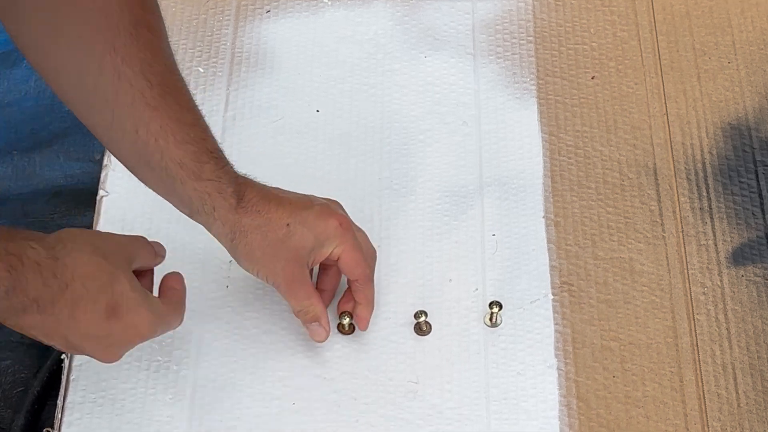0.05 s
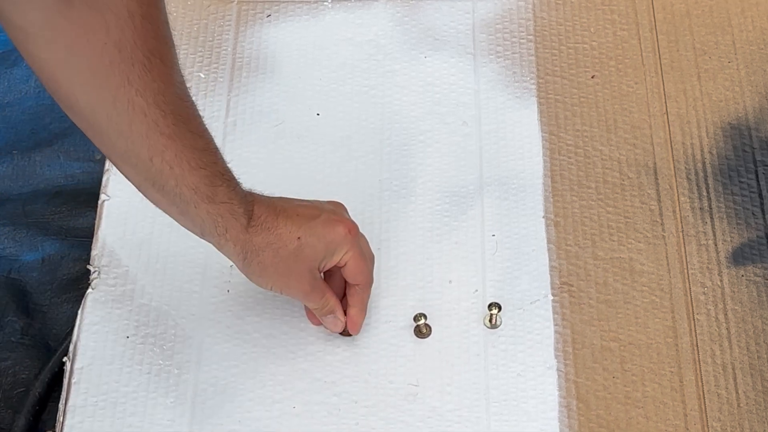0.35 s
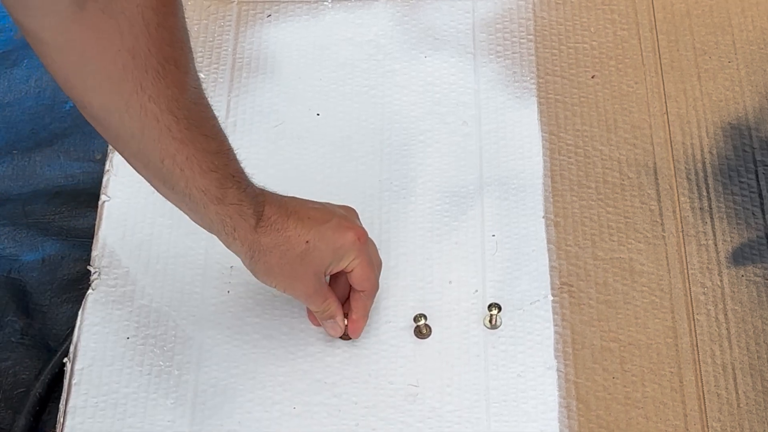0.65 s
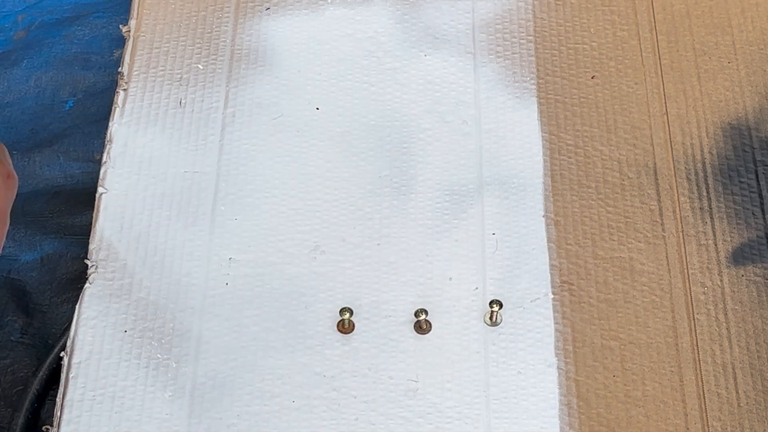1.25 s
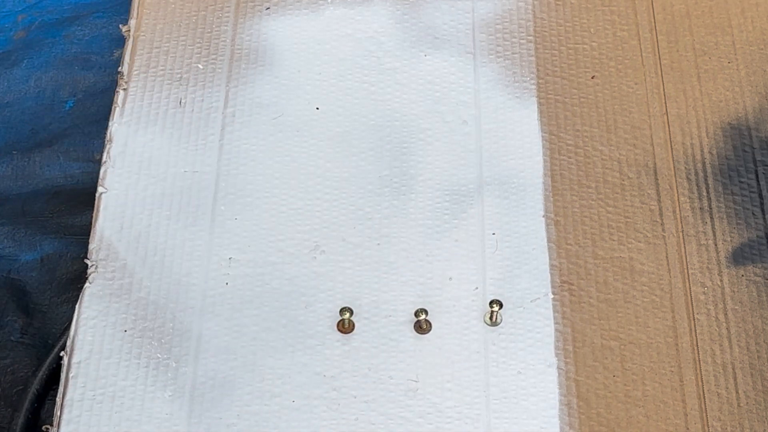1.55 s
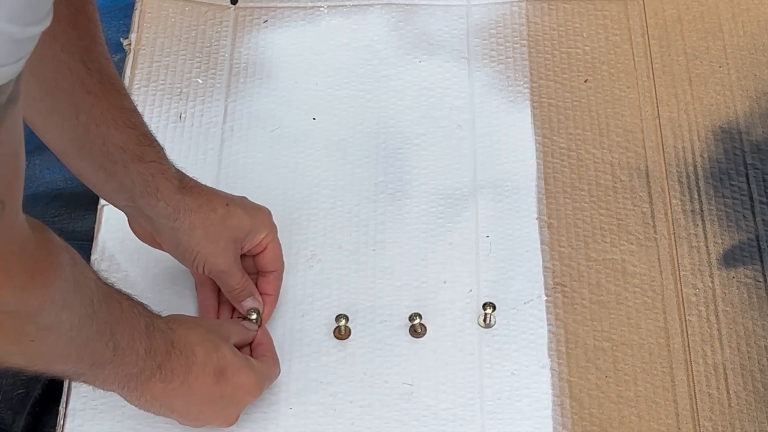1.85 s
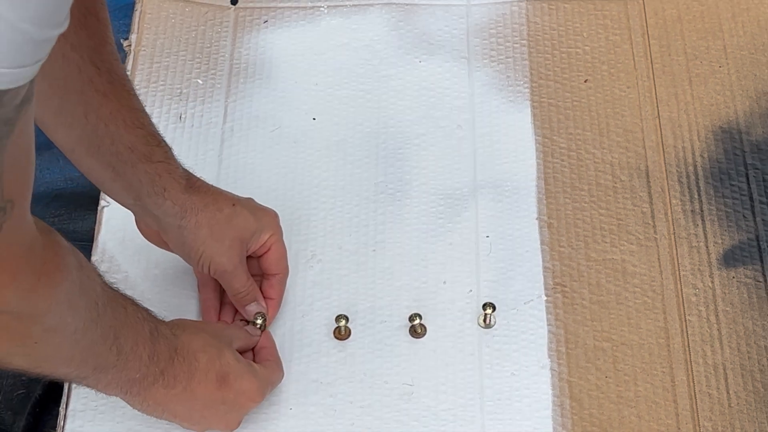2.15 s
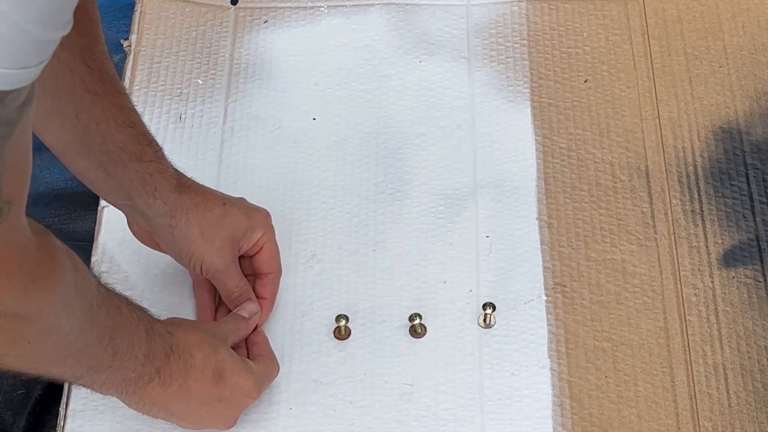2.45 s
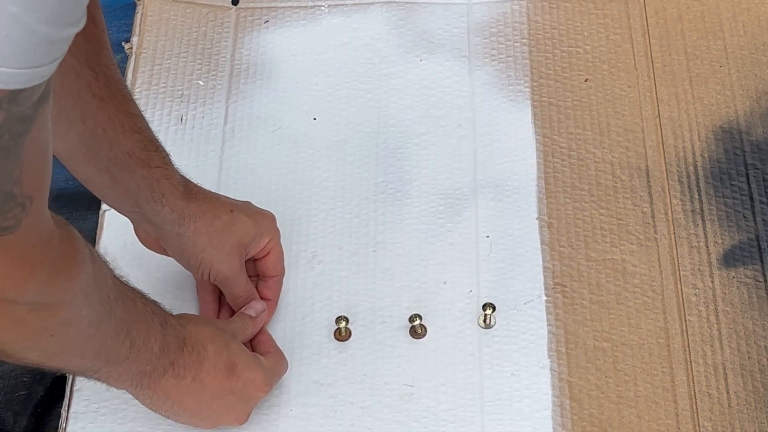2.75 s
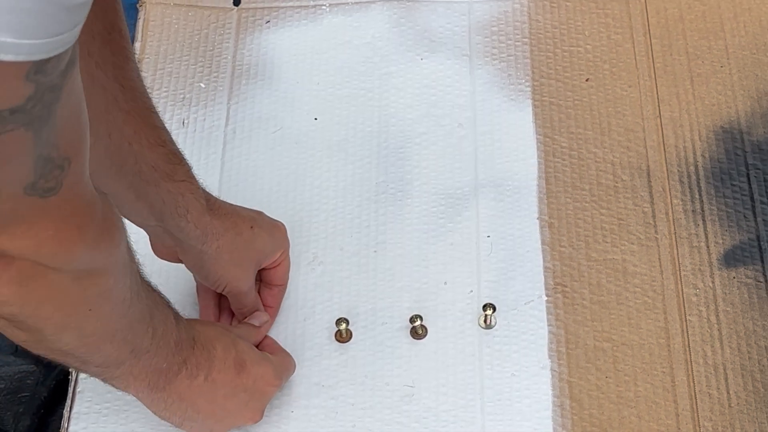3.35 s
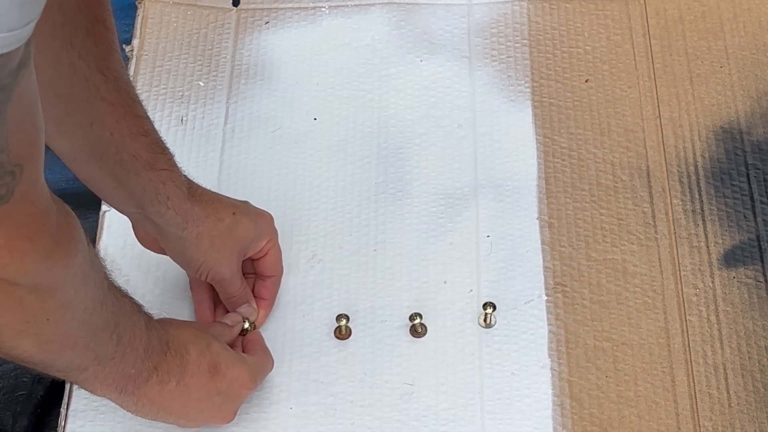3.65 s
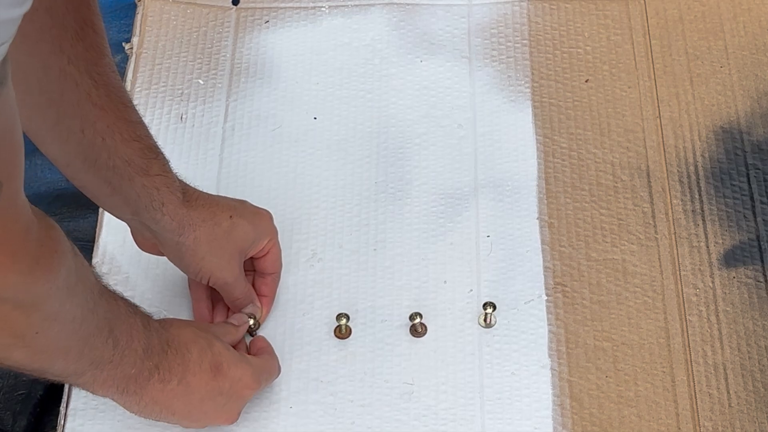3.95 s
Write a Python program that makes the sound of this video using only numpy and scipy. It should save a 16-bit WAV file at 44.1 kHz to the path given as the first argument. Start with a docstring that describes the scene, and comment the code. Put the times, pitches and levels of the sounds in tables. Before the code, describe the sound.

Metal screws being twisted into cardboard, with dry taps, clicks and soft rubbing.

```python
"""Fingers twist metal screws into a cardboard sheet in a quiet, rumbling room, heard at two close mic ports.
From 0.1 s skin and thread rub on the paper, with scattered taps; a faint far whine peaks at 0.7 s.
From 1.6 s taps and snaps cluster, each a sharp tick and a dry crack that set the sheet knocking.
At 3.3 s a tip punches through the liner with a snap and a thump; lighter taps and rubbing follow."""
import sys
import numpy as np
from scipy import signal
from scipy.fft import rfft, irfft, next_fast_len
from scipy.io import wavfile
from scipy.ndimage import uniform_filter1d, map_coordinates

SR = 44100
rng = np.random.default_rng(int(sys.argv[2]) if len(sys.argv) > 2 else 0)


def persist_wave(psi):
    """Save psi, clipped to +-1, as 16-bit WAV."""
    counts = np.round(np.clip(psi, -1, 1) * 32767).astype(np.int16)
    wavfile.write(sys.argv[1], SR, np.atleast_2d(counts).T)


N = 176400

# slow flexing of the whole sheet: (frequency [Hz], level [dB], t60 [s])
FLEX_MODES = [(66.7, -21, .16), (142, 12, 0.023)]


def taps():
    """Screw on cardboard: the metal ticks, the paper cracks, the sheet knocks and flexes."""
    # (time [s], knock [dB], knock pitch [Hz], flex [dB], crack [dB], crack centre [Hz], tick [dB])
    hits = [(0.336, -60, 695, -74, -60, 5000, -61), (0.557, -67, 697, -74, -50.5, 4540, -50),
            (0.5652, -25, 613, -39, -42, 4500, -45.5), (.696, -44, 500, -44, -57, 1000, -68),
            (0.9281, -40, 694, -58, -38.5, 1940, -53), (0.9499, -43, 900, -66, -46, 2030, -54),
            (1.622, -57, 700, -78, -60, 4000, -64.5), (1.6575, -13, 546, -29, -36, 1630, -39),
            (1.68, -36, 516, -50, -49, 2190, -60), (1.689, -34.5, 740, -55, -46.5, 1980, -53.5),
            (1.732, -40, 487, -63, -55.5, 2000, -67), (1.7572, -16, 680, -37, -33.5, 1290, -39),
            (1.7757, -17, 660, -36, -34, 1980, -35), (1.7966, -44, 800, -43, -43, 2190, -59),
            (1.832, -42.5, 695, -54, -49, 1500, -55), (1.8535, -39, 920, -54, -40.5, 1760, -50),
            (1.9127, -32, 611, -47, -45.5, 1290, -57), (2.0302, -9.5, 730, -57, -23.5, 2400, -18.5),
            (2.0362, -27.5, 560, -25.5, -27, 3800, -21), (2.407, -68.5, 701, -46, -55.5, 3440, -71),
            (2.562, -79, 704, -73, -55, 7500, -45), (2.601, -23, 698, -66, -27.5, 2400, -43.5),
            (2.6104, -64, 704, -63, -38.5, 3800, -48), (2.631, -59, 790, -62, -40.5, 2380, -48),
            (2.647, -43, 790, -65.5, -45, 4500, -54), (2.661, -67, 800, -68, -45.5, 3000, -55),
            (2.8087, -48, 870, -70, -49, 1680, -60), (2.9203, -41.5, 680, -68, -43.5, 1270, -51),
            (2.973, -70, 800, -70, -44, 5960, -46.5), (2.978, -74, 800, -75, -47.5, 3500, -50.5),
            (3.011, -68, 900, -73.5, -48, 2520, -58), (3.1646, -34.5, 750, -48.5, -40.5, 3350, -42.5),
            (3.2254, -56, 845, -49, -38, 3800, -42.5), (3.2283, -27, 686, -34.5, -30, 3730, -38.5),
            (3.2361, -38, 836, -37, -31.5, 1010, -39.5), (3.2837, -20.5, 930, -29, -29, 1400, -61.5),
            (3.524, -26, 536, -47.5, -33.5, 3000, -43.5), (3.5423, -30, 580, -46, -44.5, 2000, -59),
            (3.6337, -33.5, 643, -50, -47.5, 1777, -71), (3.881, -36, 543, -53, -49.5, 2200, -62)]
    # screw tick: (frequency [Hz], level [dB])
    tick_spectrum = [(1000, -30.5), (4000, -17.5), (7200, -10), (8600, 0), (10000, 3.5), (11400, 1.5),
                     (12800, -8), (15500, -14.5), (17000, -33.5)]
    out, t = np.zeros(N), np.arange(SR // 5) / SR
    for start_s, knock_db, knock_hz, flex_db, crack_db, crack_hz, tick_db in hits:
        sheet = amp(knock_db) * knock(t, knock_hz) + amp(flex_db) * ring(t, FLEX_MODES)
        paper = amp(crack_db) * crack(t, crack_hz)
        tick = amp(tick_db) * burst(t, tick_spectrum, t60_s=0.0059)
        add(out, start_s, sheet + paper + tick)
    return out


def knock(t, hz):
    """A bending wave, its weaker, duller return from the edge, and the sheet's lasting ring."""
    # sheet ring: (frequency [Hz], level [dB], t60 [s])
    sheet_modes = [(285, -11.5, 0.034), (434.3, -9.5, 0.076)]

    def wave(delay_s, f):
        return bend(t - delay_s, f, end_hz=0.62 * f, settle_s=0.003, peak_s=0.85 / f, shape=1.2)

    edge_return = amp(-6) * wave(0.006004, 0.83 * hz)
    detune = 1 + .04 * rng.uniform(-0.85, 1)  # varies with the place struck and hand pressure
    return wave(0, hz) + edge_return - ring(t * detune, sheet_modes)


def bend(t, start_hz, end_hz, settle_s, peak_s, shape):
    """Bending-wave packet: the pitch falls as slower waves arrive."""
    t = np.maximum(t, 0)
    cycles = end_hz * t + (start_hz - end_hz) * settle_s * (1 - np.exp(-t / settle_s))
    envelope = (t / peak_s * np.exp(1 - t / peak_s)) ** shape
    return -envelope * np.sin(2 * np.pi * cycles)


def ring(t, modes, rise_s=.002):
    """Damped modes that build up as waves cross the sheet."""
    tones = sum(amp(db) * fade(t, t60_s) * np.sin(2 * np.pi * hz * t) for hz, db, t60_s in modes)
    return (1 - np.exp(-t / rise_s)) * tones


def crack(t, centre_hz, hump_db=7, width_oct=.38, fall_db_per_oct=8):
    """Paper gives: a broad burst with a hump set by the size of the piece; large pieces are duller."""
    # paper crack: (frequency [Hz], level [dB])
    paper_spectrum = [(300, -8), (850, 4), (1550, -6), (2200, 2), (2700, -1), (3300, -6), (4200, -5),
                      (5500, -13), (7500, -10), (16000, -28)]
    hz = np.geomspace(100, SR / 2, num=60)
    octaves = np.log2(hz / centre_hz)
    hump = hump_db * np.exp(-(octaves / width_oct) ** 2 / 2)
    rolloff = fall_db_per_oct * np.maximum(octaves - 1, 0)
    spectrum = np.transpose([hz, along(paper_spectrum, hz) + hump - rolloff])
    return burst(t, spectrum, t60_s=0.012)


def burst(t, spectrum, t60_s, rise_s=0.000091, click_delay_s=.0004):
    """One clean click in a spray of breaking fibres, with the energy of 1 ms at full level."""
    settling = amp(-21) * fade(t, t60_s=0.021)  # fibres after the snap
    spray = (1 - np.exp(-t / rise_s)) * (fade(t, t60_s) + settling) * rng.standard_normal(len(t))
    click = amp(-4) * (np.arange(len(t)) == round(click_delay_s * SR))
    snap = spray / np.linalg.norm(spray) - click
    # flatten the snap's own spectrum while colouring it
    hz = np.fft.rfftfreq(len(t), 1 / SR)
    uneven_db = 10 * np.log10(uniform_filter1d(np.abs(rfft(snap)) ** 2, size=120))
    impulse = minimum_phase(np.transpose([hz, along(spectrum, hz) - uneven_db]))
    shaped = signal.fftconvolve(snap, impulse)[:len(t)]
    return shaped / np.linalg.norm(shaped) * np.sqrt(SR / 1000)


def puncture(start_s=3.3219, thump_db=-10.5, snap_db=-12.5):
    """The tip tears the liner with a broad snap; the sheet gives way with a sinking thump."""
    # tearing liner: (frequency [Hz], level [dB])
    tear_spectrum = [(300, -10), (900, -2), (1550, -9), (2100, 3), (3200, -3), (4000, 1), (5200, -4),
                     (7200, -1), (8900, -4), (11000, 2), (12800, -5), (15200, -6), (16500, -18)]
    out, t = np.zeros(N), np.arange(SR // 5) / SR
    give = bend(t, start_hz=774, end_hz=139, settle_s=0.0032, peak_s=.0016, shape=0.76)
    thump = give + amp(-14) * ring(t, FLEX_MODES)
    snap = burst(t, tear_spectrum, t60_s=0.0036)
    add(out, start_s, amp(thump_db) * thump + amp(snap_db) * snap)
    return out


def rubbing(rise_s=0.021, fall_s=0.054, waver_db=2):
    """Skin and thread slide over paper: scrape and fine hiss swell with each stroke."""
    # (start [s], length [s], scrape [dB], hiss [dB])
    strokes = [(0.083, 0.033, -59, -74), (0.115, 0.012, -41, -45), (0.153, 0.11, -62, -76),
               (0.255, 0.2, -62.5, -84.5), (0.416, 0.21, -64, -75), (0.593, 0.23, -64, -105),
               (0.881, 0.13, -59, -79), (1.658, 0.11, -53.5, -70), (1.753, 0.067, -49, -63.5),
               (1.811, 0.13, -59.5, -64.5), (1.903, 0.15, -63, -79.5), (2.032, 0.035, -42, -46),
               (2.224, 0.077, -59.5, -63.5), (2.378, 0.29, -65, -82.5), (2.561, 0.11, -60, -62.5),
               (2.61, 0.14, -54.5, -58), (2.706, 0.17, -58.5, -65.5), (2.843, 0.23, -65, -74),
               (2.882, 0.13, -55.5, -58.5), (3.006, 0.088, -58, -66), (3.057, 0.28, -56.5, -59),
               (3.202, 0.12, -50, -61.5), (3.275, 0.25, -62, -77), (3.447, 0.21, -58, -73.5),
               (3.536, 0.093, -53.5, -63), (3.614, 0.032, -53, -83), (3.859, 0.14, -61.5, -82.5)]
    # paper scrape: (frequency [Hz], level [dB])
    scrape_spectrum = [(100, -11.5), (250, 13), (480, 10.5), (900, 6), (1600, 0), (2200, -2), (3100, -7.5),
                       (5000, -11), (8000, -24), (16000, -26)]
    # fine hiss: (frequency [Hz], level [dB])
    hiss_spectrum = [(1500, -15.5), (4000, -1.5), (7200, 1.5), (8700, -4.5), (10200, 7), (11500, 5.5),
                     (12800, -2.5), (15600, -3.5), (16300, -35.5)]
    t = np.arange(N) / SR
    scrape_power, hiss_power = np.zeros(N), np.zeros(N)
    for start_s, length_s, scrape_db, hiss_db in strokes:
        ramp = np.minimum((t - start_s) / rise_s, (start_s + length_s - t) / fall_s)
        envelope = np.clip(ramp / 2 + .5, 0, 1) ** 2
        scrape_power += (amp(scrape_db) * envelope) ** 2
        hiss_power += (amp(hiss_db) * envelope) ** 2
    waver = amp(waver_db * wobble(knots_per_s=45))
    scrape = np.sqrt(scrape_power) * coloured(friction(), scrape_spectrum)
    hiss = np.sqrt(hiss_power) * coloured(friction(), hiss_spectrum)
    return waver * (scrape + hiss)


def friction(catches_per_s=380, centre_hz=4500, spread_db=5.5, decay_cycles=1.6, catch_share=0.46):
    """Single fibres catch and let go: tiny ticks, each at its own pitch, over smooth noise."""
    onsets = np.flatnonzero(rng.random(N) < catches_per_s / SR)[:, None]
    hz = np.clip(centre_hz * 2 ** rng.standard_normal(N)[onsets], 700, 15000)
    size = amp(spread_db * np.minimum(rng.exponential(size=N)[onsets], 2.6))
    offsets = np.arange(256)
    cycles = hz * offsets / SR
    ticks = size * hz * np.exp(-cycles / decay_cycles) * np.sin(2 * np.pi * cycles)
    catches = unit(np.bincount((onsets + offsets).ravel(), ticks.ravel(), N)[:N])
    return np.sqrt(catch_share) * catches + np.sqrt(1 - catch_share) * rng.standard_normal(N)


def room(x, tail_db=-20):
    """Direct sound, two near reflections and a faint, bright tail."""
    # near reflections: (delay [s], level [dB])
    echoes = [(.0036, -17), (.0105, -22)]
    # tail decay: (frequency [Hz], t60 [s])
    tail_t60 = [(100, .25), (500, .2), (2000, .25), (7000, .38), (11000, .37), (16000, .3)]
    # tail colour: (frequency [Hz], level [dB])
    tail_spectrum = [(100, -2), (500, -6), (2000, -6), (4800, -2), (7200, 2), (11000, -4), (14000, 0)]
    hz, t, noise = signal.stft(rng.standard_normal(SR // 2), SR, nperseg=256)
    bands = noise * fade(t, along(tail_t60, hz)[:, None]) * amp(along(tail_spectrum, hz))[:, None]
    tail = signal.istft(bands, SR, nperseg=256)[1]
    near = filtered(x, lambda f: sum(amp(db) * np.exp(-2j * np.pi * f * s) for s, db in echoes))
    return x + near + amp(tail_db) * signal.fftconvolve(x, tail / np.linalg.norm(tail))[:N]


def whine(centre_hz=1570, width_hz=80, level_db=-75, peak_s=.7, spread_s=.28):
    """A faint, far, narrow tone swells and fades."""
    band = filtered(rng.standard_normal(N), lambda hz: np.exp(-((hz - centre_hz) / width_hz) ** 2))
    swell = np.exp(-((np.arange(N) / SR - peak_s) / spread_s) ** 2 / 2)
    return amp(level_db) * swell * unit(band)


def rumble(level_db=-47):
    """Steady low room noise with a trace of hiss."""
    # room noise: (frequency [Hz], level [dB])
    air_spectrum = [(20, -43.5), (30, -24), (42, -13.5), (55, -4), (72, -2), (100, -9), (140, -16.5),
                    (190, -22.5), (280, -30.5), (450, -33), (860, -42.5), (1800, -49), (2800, -49),
                    (4000, -56), (8600, -65.5), (15700, -67.5), (16300, -82)]
    return amp(level_db) * coloured(rng.standard_normal(N), air_spectrum)


def amp(db):
    """Decibels to gain."""
    return 10 ** (np.asarray(db) / 20)


def unit(x):
    """Scale to rms 1."""
    return x / np.sqrt(np.mean(x ** 2) + 1e-20)


def fade(t, t60_s):
    """Exponential decay."""
    return np.exp(-np.log(1000) * t / t60_s)


def along(points, hz):
    """Read (Hz, value) points on a log axis."""
    knots_hz, values = np.transpose(points)
    return np.interp(np.log(hz + 1), np.log(knots_hz + 1), values)


def filtered(x, response):
    """Apply a complex frequency response."""
    size = next_fast_len(N + SR // 2)
    return irfft(rfft(x, size) * response(np.fft.rfftfreq(size, 1 / SR)), size)[..., :N]


def coloured(x, spectrum):
    """Give x a spectrum, at rms 1."""
    return unit(filtered(x, lambda hz: amp(along(spectrum, hz))))


def minimum_phase(spectrum, size=512):
    """Causal impulse response of a spectrum."""
    cepstrum = irfft(np.log(amp(along(spectrum, np.fft.rfftfreq(size, 1 / SR)))))
    cepstrum[1:size // 2] *= 2
    cepstrum[size // 2 + 1:] = 0
    return irfft(np.exp(rfft(cepstrum)))


def wobble(knots_per_s):
    """Smooth random curve."""
    knots = rng.standard_normal(int(N * knots_per_s / SR) + 4)
    return map_coordinates(knots, [np.arange(N) * knots_per_s / SR])


def add(track, start_s, sound):
    """Mix a sound into the track."""
    part = track[round(start_s * SR):][:len(sound)]
    part += sound[:len(part)]


def scene():
    """Handling and background reach the two ports slightly out of step."""
    # port phase: (frequency [Hz], left lead [rad])
    phase = [(20, 0), (250, .05), (900, .24), (2000, .1), (3100, -.75), (5000, -.35), (7700, -.35),
             (8350, -3), (9400, -2.95), (10400, -.9), (11600, .5), (13000, 2.6), (14700, 5.3), (16200, 6.6)]
    # port balance: (frequency [Hz], left minus right [dB])
    balance = [(30, -1), (120, -1.4), (300, -1.1), (1000, -.1), (16000, .2)]
    mono = room(taps() + puncture() + rubbing()) + whine() + rumble()
    sides = np.array([[.5], [-.5]])
    return filtered(mono, lambda hz: amp(sides * along(balance, hz)) * np.exp(1j * sides * along(phase, hz)))


def record(dry):
    """The recorder keeps nothing above its band limit."""
    top_hz, taper_hz = 16900, 1100
    return filtered(dry, lambda hz: np.clip((top_hz - hz) / taper_hz, 0, 1) ** 2)


dry = scene()
out = record(dry)
persist_wave(out)
```